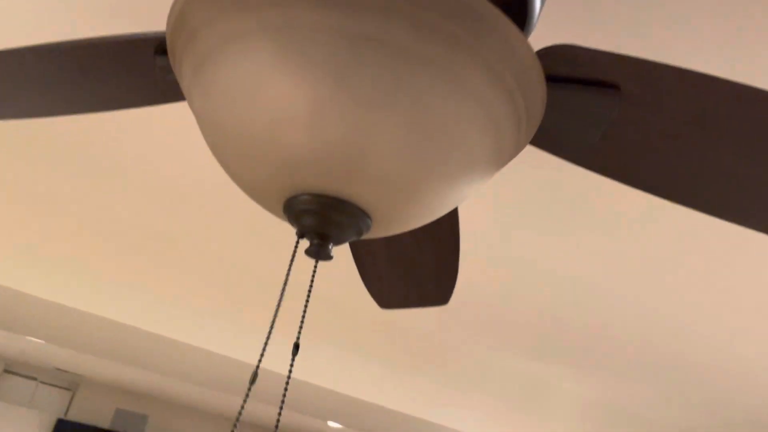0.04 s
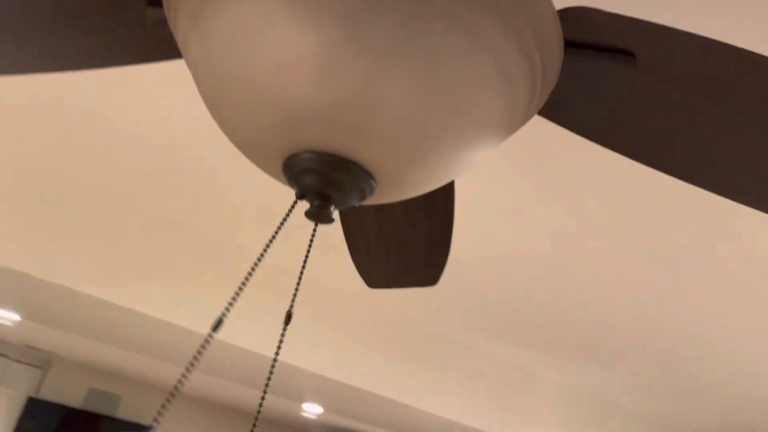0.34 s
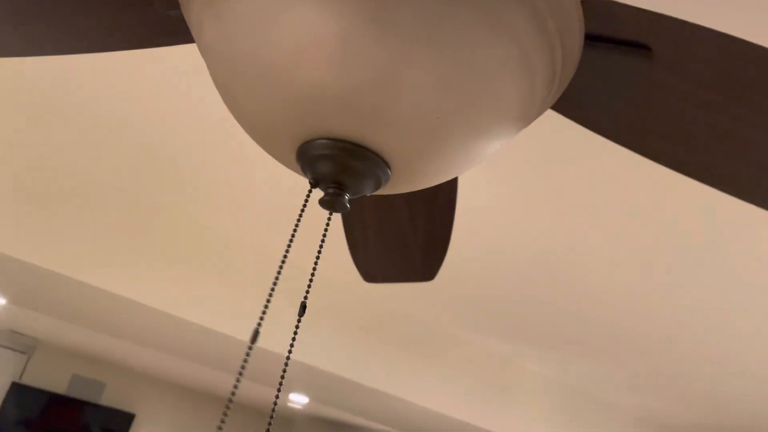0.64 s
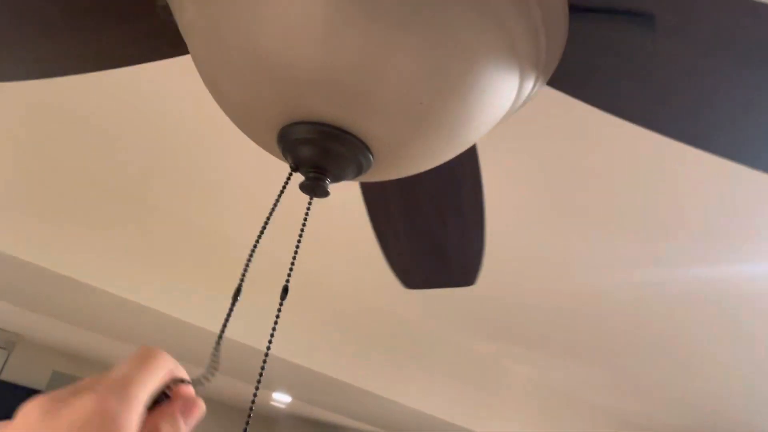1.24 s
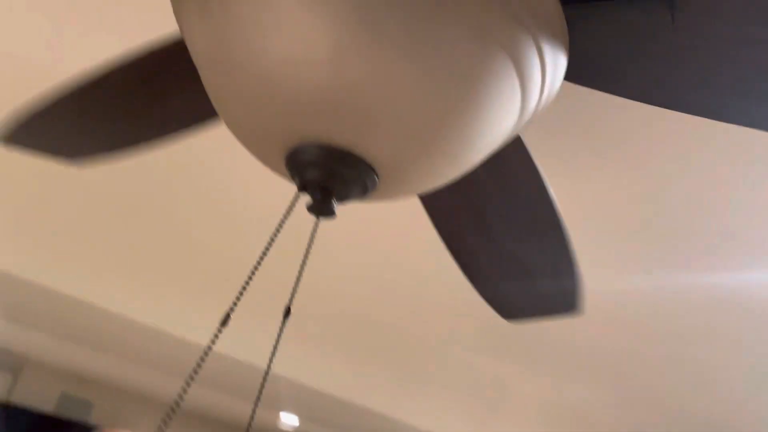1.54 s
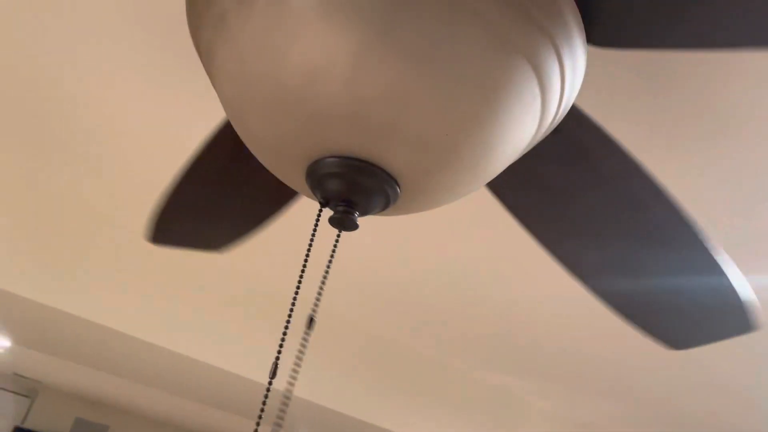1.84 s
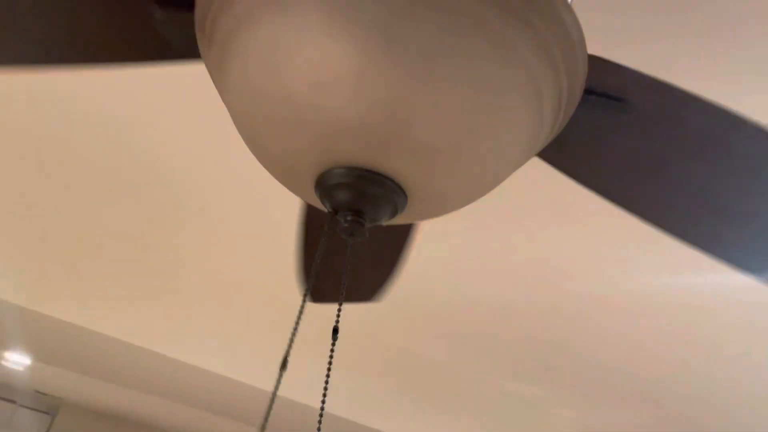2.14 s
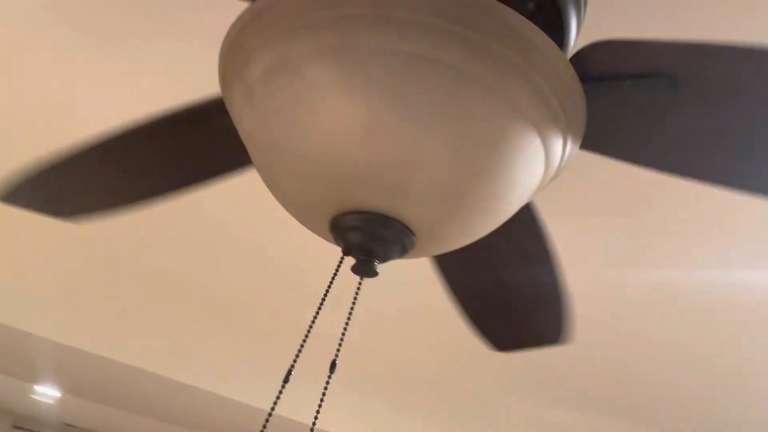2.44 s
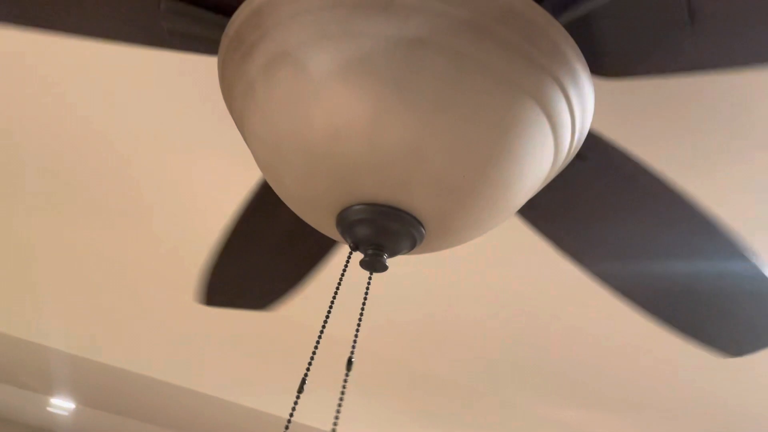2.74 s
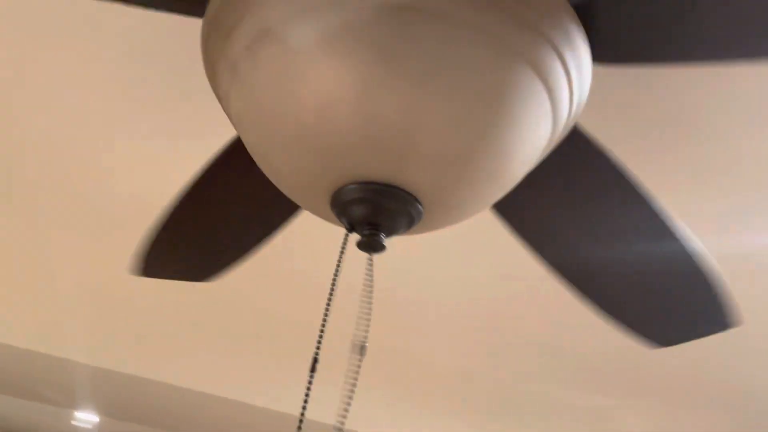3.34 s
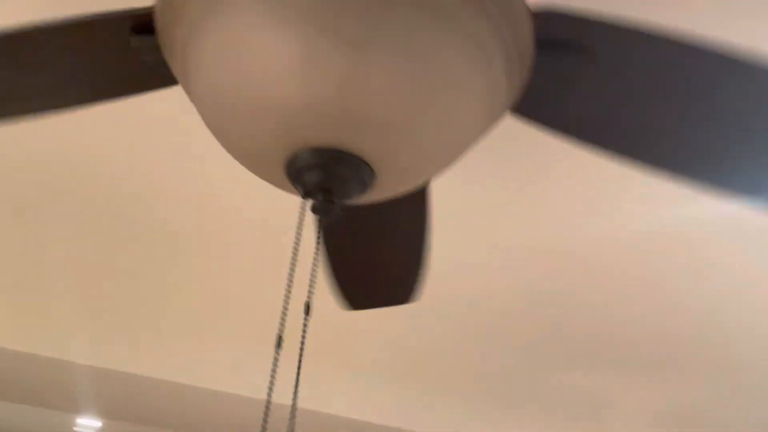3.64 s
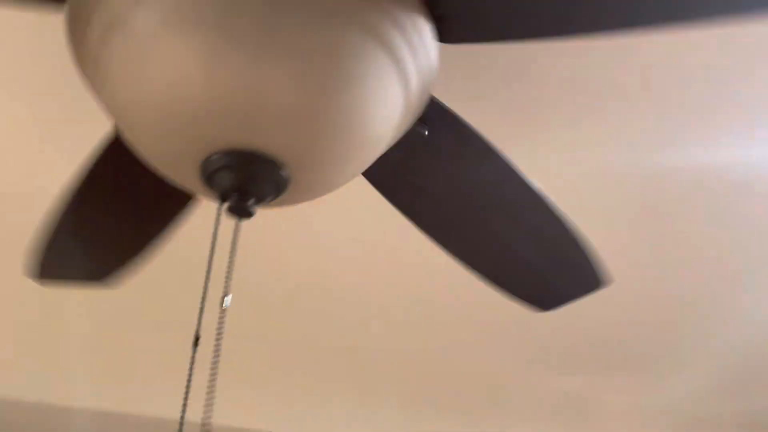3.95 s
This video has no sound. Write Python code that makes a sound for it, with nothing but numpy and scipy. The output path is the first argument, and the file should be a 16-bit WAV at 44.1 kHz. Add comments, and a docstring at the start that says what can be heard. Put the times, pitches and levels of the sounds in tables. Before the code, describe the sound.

Metallic clicks of a fan's pull-chain switch, tugged and let go three times indoors.

```python
"""A ceiling fan's pull-chain switch, pulled and let go three times, heard from below in a living room.
Each pull ratchets the switch, rings its metal housing and shakes the fan; each release snaps back
with a duller knock. The bead chain slides and ticks, and one dry snap sounds close to the two-port
microphone. Behind it all are the motor's hum, the low rumble of moving air and a few soft bumps."""
import sys
import numpy as np
from scipy import signal
from scipy.fft import rfft, irfft
from scipy.io import wavfile
from scipy.ndimage import uniform_filter1d

SR = 44100
rng = np.random.default_rng(int(sys.argv[2]) if len(sys.argv) > 2 else 0)


def master(y):
    """Save y as 16-bit WAV."""
    cut = np.clip(np.atleast_2d(y).T, -1, 1)
    pcm = np.round(cut * 32767)  # scale
    wavfile.write(sys.argv[1], SR, pcm.astype(np.int16))


N = 176400


def amp(db):
    return 10 ** (np.asarray(db) / 20)


def unit_rms(x):
    return x / np.sqrt(np.mean(x ** 2) + 1e-20)


def curve_at(points, hz):
    """Read a curve along a logarithmic frequency axis."""
    f, value = np.transpose(points)
    return np.interp(np.log(hz + 1), np.log(f + 1), value)


def add(mix, start_s, sound):
    part = mix[max(round(start_s * SR), 0):][:len(sound)]
    part += sound[:len(part)]


def colour(x, points, size=4096):
    """Causal filter following a curve of (frequency [Hz], gain [dB])."""
    log_gain = np.log(amp(curve_at(points, abs(np.fft.fftfreq(size, 1 / SR)))))
    minimum_phase = np.exp(np.conj(signal.hilbert(log_gain)))
    taps = np.fft.ifft(minimum_phase).real[:size // 2]
    return signal.fftconvolve(x, taps)[:len(x)]


def drift(rate_hz):
    """Slow random wander of unit size."""
    hz = np.fft.rfftfreq(N, 1 / SR)
    return unit_rms(irfft(rfft(rng.standard_normal(N)) * np.exp(-(hz / rate_hz) ** 2) * (hz > 0), N))


def waveform(spectra):
    return signal.istft(spectra, SR, nperseg=1024, noverlap=768)[1]


# likeness of diffuse sound at the two microphone ports (frequency [Hz], coherence [0-1])
PORT_COHERENCE = [(60, 0.83), (250, 0.91), (700, 0.44), (1800, 1), (5000, 0.27), (8000, 1), (13000, 0.35)]
def diffuse(count):
    """Short-time spectra of noise reaching the microphone from all sides."""
    hz, t, noise = signal.stft(rng.standard_normal((2, count)), SR, nperseg=1024, noverlap=768)
    same = np.clip(curve_at(PORT_COHERENCE, hz), 0, 1)[:, None]
    mid, side = noise[0] * np.sqrt((1 + same) / 2), noise[1] * np.sqrt((1 - same) / 2)
    return hz[:, None], t, np.array([mid + side, mid - side])


# room tone (frequency [Hz], gain [dB])
AIR_COLOUR = [(20, -34.5), (40, -20.5), (60, -0.5), (85, 1.5), (130, -13), (200, -24), (280, -25.5),
              (400, -33.5), (520, -30), (800, -39.5), (1400, -51.5), (3000, -53.5), (5000, -59),
              (6600, -59.5), (8200, -74), (11000, -63), (15000, -75.5)]
def air(level_db=-44.5, patchy_db=1.3):
    """Air moving all around the microphone: a low rumble and a faint, slightly patchy hiss."""
    _, _, spectra = diffuse(N)
    patches = uniform_filter1d(rng.standard_normal(spectra.shape[1:]), size=10, axis=0)
    patches = unit_rms(uniform_filter1d(patches, size=20, axis=1))
    noise = waveform(spectra * amp(patchy_db * patches))[:, :N]
    gain = amp(curve_at(AIR_COLOUR, np.fft.rfftfreq(N, 1 / SR)))
    return amp(level_db) * unit_rms(irfft(rfft(noise) * gain, N))


# tones of the fan motor (frequency [Hz], level [dB])
MOTOR_TONES = [(60, -43), (120, -61.5), (255, -69.5)]
def motor(waver=0.21):
    """Mains hum and faint motor tones from the ceiling, wavering in level and phase."""
    out, t = np.zeros(N), np.arange(N) / SR
    for hz, db in MOTOR_TONES:
        swell = 1 + waver * drift(11.0)
        out += np.sqrt(2) * amp(db) * swell * np.sin(2 * np.pi * hz * t + waver * drift(3.1))
    return out


# decay of the living room (frequency [Hz], t60 [s])
ROOM_DECAY = [(150, 0.82), (600, 0.1323), (1800, 0.3658), (4000, 0.3873), (7000, 0.36), (13000, 0.255)]
# tone of its tail (frequency [Hz], gain [dB])
TAIL_COLOUR = [(150, -6.5), (600, 1.5), (1800, -2.5), (4000, -4), (7000, -5.5), (8200, -19.5), (9800, -7.5),
               (12400, -7), (13600, -20.5)]
def room(x, early_db=-3.5, early_fall_s=0.0066, tail_rise_s=0.0028):
    """Quick reflections off the ceiling and glass bowl reach the microphone, then the room's tail."""
    hz, t, spectra = diffuse(SR)
    tail = waveform(spectra * amp(-60 * t / curve_at(ROOM_DECAY, hz)))
    t = np.arange(tail.shape[1]) / SR
    tail *= 1 - np.exp(-t / tail_rise_s)
    tail = np.array([colour(side, TAIL_COLOUR) for side in tail / np.linalg.norm(tail[0])])
    early = waveform(diffuse(SR)[2]) * np.exp(-t / early_fall_s) * (t > .002)
    response = tail + amp(early_db) * early / np.linalg.norm(early[0])
    return signal.fftconvolve(x[None], response, axes=1)[:, :N]


# bumps in the room (time [s], level [dB], length [s])
SOFT_BUMPS = [(2.454, -50, 0.061), (3.152, -49, 0.052), (3.61, -41.5, 0.049)]
# their dull tone (frequency [Hz], gain [dB])
BUMP_TONE = [(40, -12.5), (130, 5), (300, 2.5), (450, -15), (800, -32), (8000, -79)]
def bumps():
    """Soft background bumps: brief swells of low noise with no ring."""
    out, t = np.zeros(N), np.arange(SR // 2) / SR
    for start, db, length in SOFT_BUMPS:
        age = 2 * t / length
        noise = unit_rms(colour(rng.standard_normal(len(t)), BUMP_TONE))
        add(out, start, amp(db) * age * np.exp(1 - age) * noise)
    return out


# tone of the snap (frequency [Hz], gain [dB])
SNAP_TONE = [(200, -12), (1500, -3.5), (3000, 0), (5500, 11.5), (6800, 10), (8000, -11), (11000, -14),
             (14000, -34)]
def snap(time_s=3.5455, impulse_db=-17):
    """One very short, dry contact close to the microphone."""
    out = np.zeros(N)
    add(out, time_s, amp([impulse_db]))
    return colour(out, SNAP_TONE)


# thuds of the shaken fan (time [s], level [dB], pitch [Hz])
FAN_THUDS = [(.55, -35, 102.7), (0.686, -32.5, 125.3), (0.734, -23.5, 110.7), (0.786, -26, 94.5),
             (1.644, -35, 103.5), (1.79, -27, 121), (1.879, -28, 98.1), (2.73, -35, 108.5),
             (2.842, -21, 115.3), (2.91, -31, 123.8)]
def thuds(rise_s=0.005, fall_s=0.043):
    """The fan's body shudders on its ceiling mount after each tug."""
    out, t = np.zeros(N), np.arange(SR // 2) / SR
    for start, db, hz in FAN_THUDS:
        phase = 2 * np.pi * hz * t
        shudder = np.sin(phase) + 0.3 * np.sin(1.38 * phase) + 0.5 * np.sin(0.64 * phase)
        add(out, start, amp(db) * shudder * (1 - np.exp(-t / rise_s)) * np.exp(-t / fall_s))
    return out


# runs of the chain (time [s], length [s], level [dB])
BEAD_SLIDES = [(0.536, 0.019, -57), (1.06, 0.077, -50.5), (2.113, 0.059, -50), (3.148, 0.11, -54.5)]
# tone of beads on the eyelet (frequency [Hz], gain [dB])
SLIDE_TONE = [(100, -14), (520, 11.5), (1000, -2), (1800, -10), (1985, 9), (2200, -13.5), (2800, -1),
              (4000, -19), (7000, -13), (14000, -52)]
def slides():
    """Up at the switch, beads run through the eyelet in a grainy rasp."""
    out = np.zeros(N)
    for start, length, db in BEAD_SLIDES:
        progress = np.linspace(0, 1, int(length * SR))
        arch = (4 * progress * (1 - progress)) ** 0.31
        rasp = unit_rms(colour(rng.standard_normal(N) ** 3, SLIDE_TONE))
        add(out, start, amp(db) * arch * rasp[:len(arch)])
    return out


def crack(rattle_s, size=4096):
    """A contact breaks into a few milliseconds of tiny impacts and stops short."""
    t = np.arange(size) / SR
    impacts = rng.standard_normal(size) * rng.exponential(1, size) * np.exp(-(t / rattle_s) ** 2)
    spectrum = rfft(impacts)
    evened = spectrum / (abs(spectrum) + 1e-9) ** (2 / 3)
    burst = irfft(evened) * (t < t[-1] / 2)
    return burst / np.linalg.norm(burst)


# light touches of the chain (time [s], level [dB], ping [Hz])
CHAIN_TICKS = [(.127, -33, 6750), (0.1562, -26, 6900), (1.41, -34.5, 6800), (2.0071, -23.5, 6030),
               (3.56, -22.5, 6500), (3.58, -20, 6710), (3.92, -23.5, 5975)]
# tone of each touch (frequency [Hz], gain [dB])
TICK_TONE = [(200, -26), (2000, -11), (2900, -8), (4500, -13.5), (6300, -0.5), (7200, -0.5), (8200, -3.5),
             (14000, -26)]
def ticks(ping_db=-29.5, ping_t60_s=0.055):
    """The chain swings against metal overhead: a light contact and a small ping."""
    out, t = np.zeros(N), np.arange(SR // 2) / SR
    for start, db, hz in CHAIN_TICKS:
        add(out, start, amp(db) * colour(crack(rattle_s=0.005), TICK_TONE))
        add(out, start, amp(db + ping_db - 60 * t / ping_t60_s) * np.sin(2 * np.pi * hz * t))
    return out


def scrape(click_db, base_db=-19.5, rise_s=0.0052, lead_s=0.026, click_share=0.51):
    """Beads drag ever harder on the eyelet until the click; this stands out more before a weak one."""
    t = np.arange(-lead_s, 0, 1 / SR)
    rasp = rng.standard_normal(len(t)) * rng.exponential(1, len(t)) * np.exp(t / rise_s)
    return amp(base_db - (1 - click_share) * click_db) * rasp / np.linalg.norm(rasp)


def ring(modes, partials=7, spread_hz=12, spread_share=0.006):
    """Loosely joined parts: every mode is a cluster of close, beating partials that share its energy."""
    t = np.arange(SR // 2) / SR
    out = np.zeros(len(t))
    for hz, db, t60 in modes:
        detune, phase = rng.uniform(-1.052, 1, (2, partials, 1))
        partial_hz = hz + (spread_hz + spread_share * hz) * detune
        fade = amp(-60 * t / t60)
        cluster = fade * np.sin(2 * np.pi * (partial_hz * t + phase)).sum(0)
        out += amp(db) * unit_rms(cluster) * np.sqrt(np.mean(fade ** 2) / 2)
    return out


def switch(clicks, modes, tone, contact_db, ring_db, rattle_s):
    """Each click is a scrape, a crack and ringing metal, with its own weight and brightness."""
    out = np.zeros(N)
    for click_s, body_db, middle_db, treble_db in clicks:
        lead_in = scrape(treble_db)
        lead_s = len(lead_in) / SR
        contact = np.concatenate([lead_in, crack(rattle_s), np.zeros(SR // 4)])
        click = amp(contact_db) * colour(contact, tone)
        metal = ring(modes)
        build_up = 1 - np.exp(-2 * np.arange(len(metal)) / SR / rattle_s)
        add(click, lead_s, amp(ring_db) * metal * build_up)
        weight = [(650, body_db), (1500, middle_db), (4200, middle_db), (6500, treble_db)]
        add(out, click_s - lead_s, colour(click, weight))
    return out


# clicks of the return (time [s], body [dB], middle [dB], treble [dB])
RELEASE_CLICKS = [(1.0615, -12.5, -21, -3.5), (1.0898, -21, -17, 2), (1.1018, -6.5, -11, 0),
                  (1.1052, 3, -5, 4.5), (2.116, -26, -20.5, -13.5), (2.140, -25, -27, -6),
                  (2.157, 1.5, -0.5, -0.5), (3.204, -35.5, -23, -16), (3.2295, -4.5, -20, -8),
                  (3.2395, -9, -4.5, 0), (3.244, -3, -6.5, -19)]
# ring of the switch springing back (frequency [Hz], level [dB], t60 [s])
SPRING_MODES = [(341.7, -9.5, 0.32), (515, 0.5, 0.31), (601, 0, 0.05), (898, -11.5, 0.086),
                (1465, -4.5, 0.11), (2020, -6.5, 0.11), (2850, -19, 0.14), (3375, 5, 0.028),
                (3480, -13.5, 0.066), (4170, 9.5, 0.036), (5310, -6.5, 0.19), (12050, -6, 0.044)]
# tone of the knock (frequency [Hz], gain [dB])
KNOCK_TONE = [(100, -2.5), (350, -15), (540, 12.5), (760, -2.5), (1600, -9), (1950, -1), (2500, -18.5),
              (3450, 3), (4200, -7.5), (4650, -2), (5300, -9), (8200, -2), (9800, -8), (12800, -20.5),
              (15000, -25)]
def releases():
    """The spring draws the chain back up into the switch with a duller knock."""
    return switch(RELEASE_CLICKS, SPRING_MODES, KNOCK_TONE, contact_db=-1, ring_db=-43.5, rattle_s=0.0045)


# clicks of the ratchet (time [s], body [dB], middle [dB], treble [dB])
PULL_CLICKS = [(.5445, -14.5, -10.5, -16), (.6795, -13.5, -2, -3.5), (.6815, -3, -8.5, -4.5),
               (.7245, -29, -6, -0.5), (.7285, 1, 2, -2), (.7645, -7, -14.5, -13.5),
               (1.6085, -12.5, -6.5, -5.5), (1.649, -10, -7, -8.5), (1.7805, -2.5, -2.5, 1),
               (1.7835, -0.5, 2, -0.5), (2.714, -12.5, -13.5, -18.5), (2.809, -18, -4, -5.5),
               (2.813, 0, -1.5, -3.5), (2.8395, -19, -0.5, -13), (2.8425, -3.5, 2, 2.5)]
# ring of the switch housing (frequency [Hz], level [dB], t60 [s])
HOUSING_MODES = [(291.3, -9, 0.19), (340.8, -1, 0.15), (516.4, -8, 0.31), (616.7, 2.5, .11),
                 (1125, -17, 0.32), (1960, -7, 0.06), (4315, -6, 0.087), (4920, -10, .14), (5394, -8, 0.15),
                 (6250, -2, 0.05), (6720, 2.5, 0.15), (7030, -6.5, 0.088), (8850, 11, 0.028),
                 (10030, -8, 0.087), (10600, -10, 0.061), (11640, -11.5, .07), (12300, -11, 0.081)]
# tone of the ratchet (frequency [Hz], gain [dB])
RATCHET_TONE = [(100, 3), (300, 4.5), (600, 3.5), (850, -4), (1500, -10.5), (1900, -7.5), (2400, -14),
                (4600, -13), (6000, -3), (7200, 4.5), (8600, 6.5), (9600, -1.5), (13000, -6.5),
                (15000, -19)]
def pulls():
    """Above the microphone, each tug ratchets the switch and rings its metal housing."""
    return switch(PULL_CLICKS, HOUSING_MODES, RATCHET_TONE, contact_db=-1, ring_db=-38, rattle_s=0.0039)


# sound from overhead at the two ports (frequency [Hz], lead of the left port [rad])
LEFT_LEAD = [(0, 0), (1550, .1), (2840, .4), (5000, .5), (6120, -.4), (6980, -1.8), (7840, -2.9),
             (9300, -3.7), (10400, -5.2), (13100, -7.4)]
# balance at the microphone (frequency [Hz], left minus right [dB])
PORT_BALANCE = [(100, -2.5), (900, -1.3), (2000, -1.6), (4000, 1.5)]
def scene():
    """The living room from the microphone below the fan; the bass leans right, the treble left."""
    chain = pulls() + releases() + ticks() + slides()
    hz, sides = np.fft.rfftfreq(N, 1 / SR), np.array([[.5], [-.5]])
    port_phase = sides * np.interp(hz, *np.transpose(LEFT_LEAD))
    overhead = irfft(rfft(chain + room(chain)) * np.exp(1j * port_phase), N)
    low = thuds() + bumps()
    mix = overhead + snap() + low + amp(-5.5) * room(low) + motor() + air()
    return irfft(rfft(mix) * amp(sides * curve_at(PORT_BALANCE, hz)), N)


def record(dry):
    """The recorder's band limit cuts the highest treble."""
    edge_hz = 14300
    lowpass = signal.firwin(255, edge_hz, window=("kaiser", 8), fs=SR)
    return signal.oaconvolve(dry, lowpass[None], "same")


dry = scene()
out = record(dry)
master(out)
```